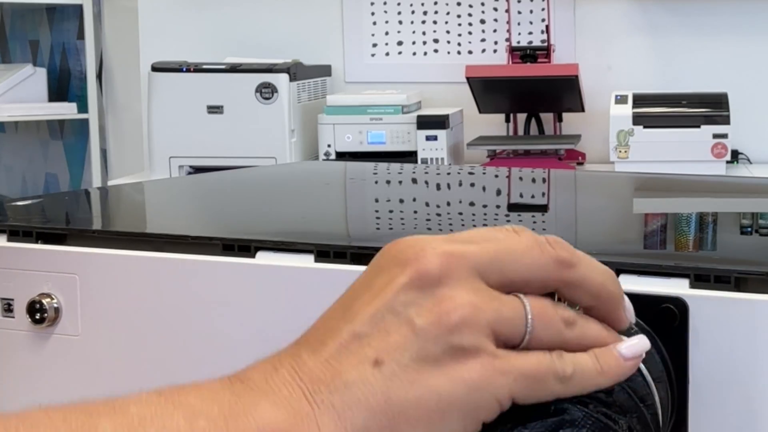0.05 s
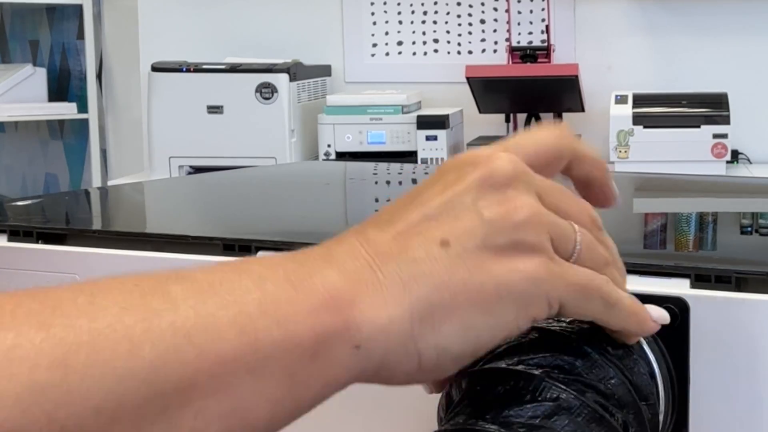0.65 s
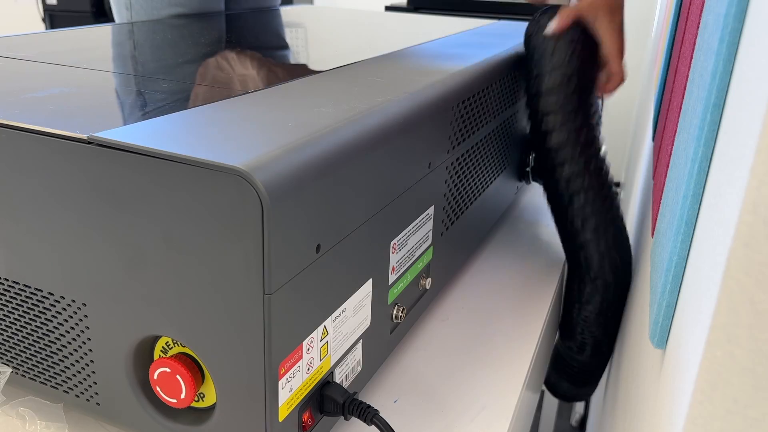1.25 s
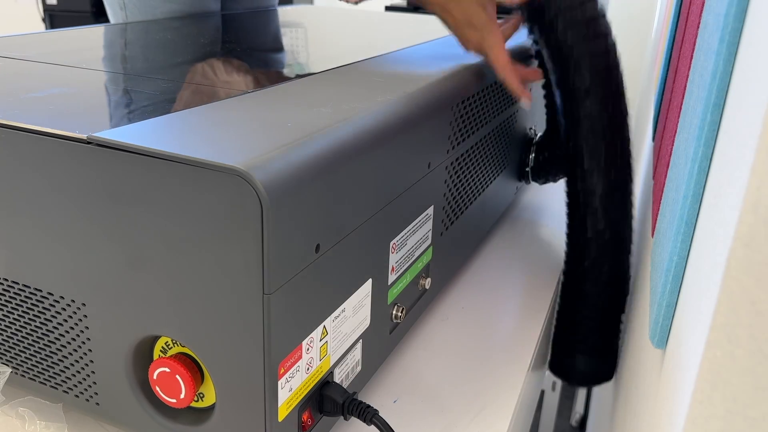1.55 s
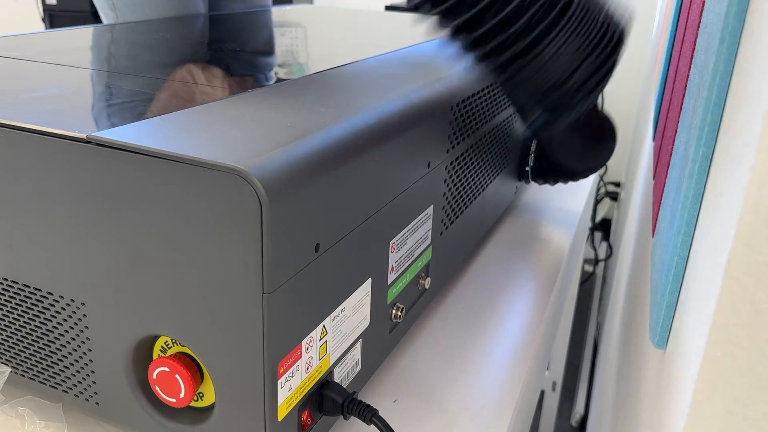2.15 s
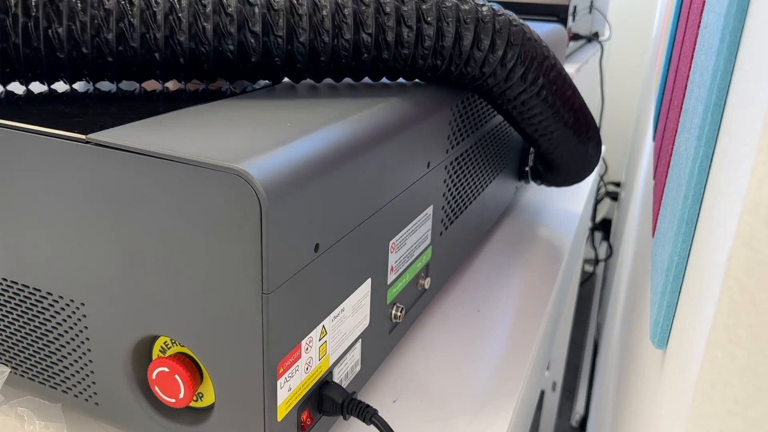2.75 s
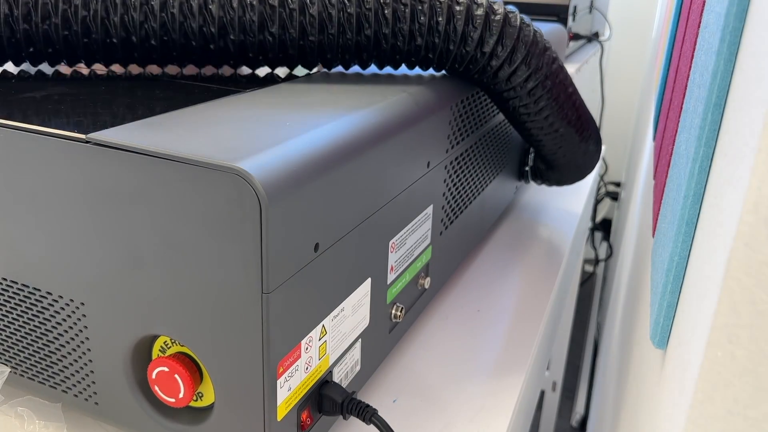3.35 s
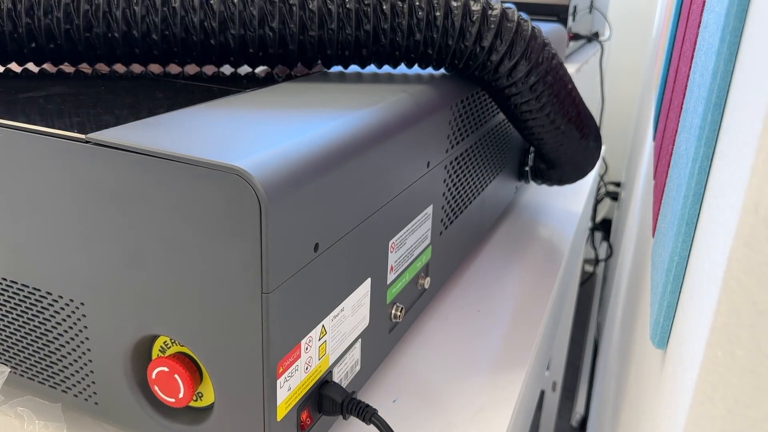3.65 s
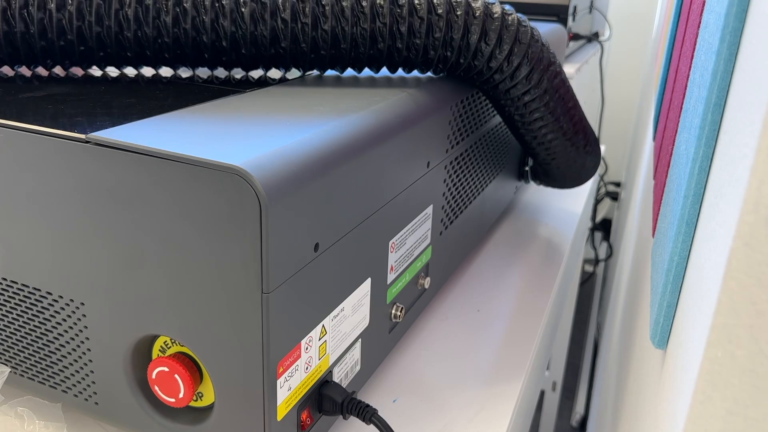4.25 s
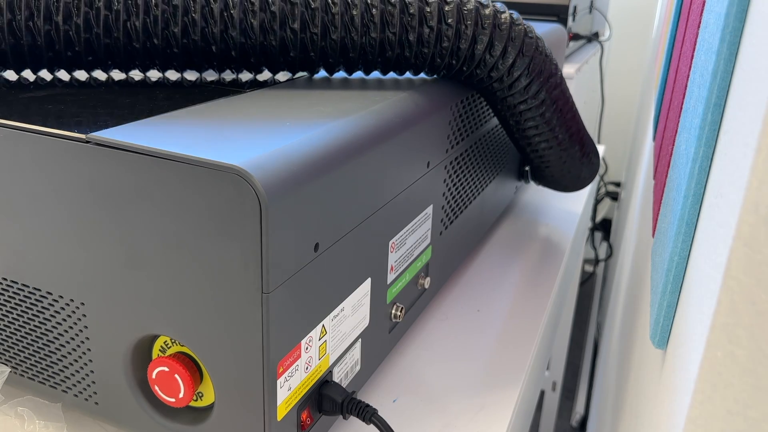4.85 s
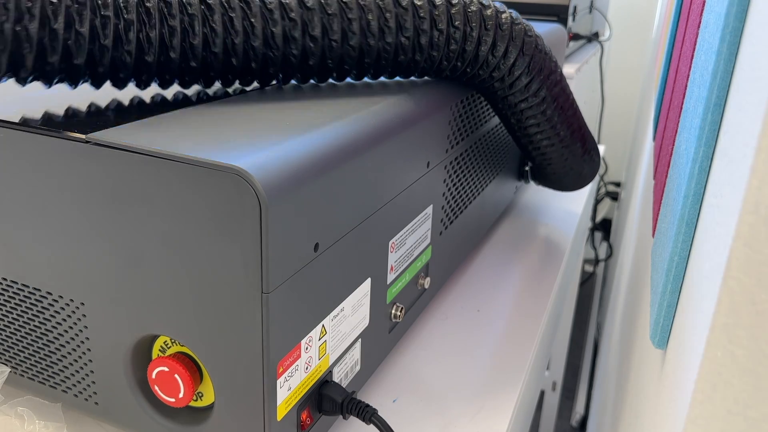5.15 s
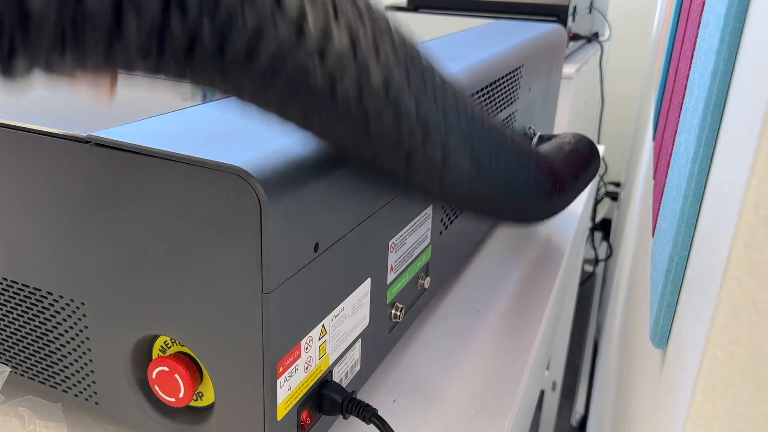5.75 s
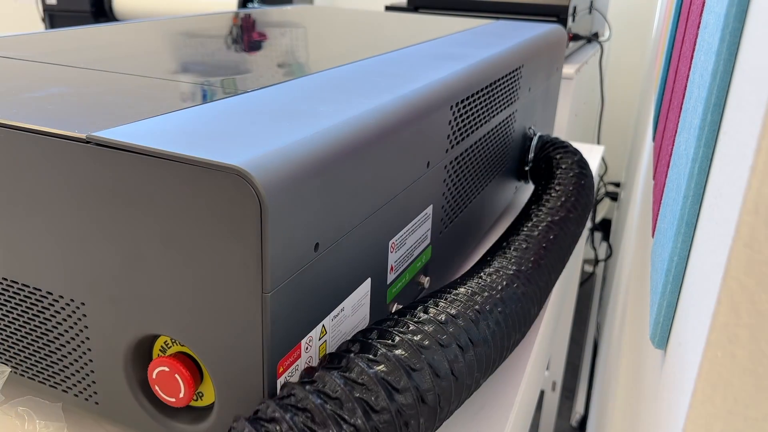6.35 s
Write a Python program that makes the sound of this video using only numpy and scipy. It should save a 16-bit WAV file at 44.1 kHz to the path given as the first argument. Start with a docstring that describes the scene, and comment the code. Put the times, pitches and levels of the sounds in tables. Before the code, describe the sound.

Close to the microphone in a small workshop, a flexible duct hose rubs and bumps against a hollow metal housing with low rumbles and brief ringing knocks. Its foil folds crinkle and snap sharply as it bends, loudest in the first half. After a quieter stretch of rustling comes a longer run of crackling, slightly to the left, then some soft taps. Faint ventilation hums underneath.

```python
"""Fitting an exhaust hose

A ribbed foil-and-wire hose is twisted onto the port of a sheet-metal machine, then lifted over it
and laid down. Its folds crinkle and snap as it bends, its cuff scrapes over the metal, and its ribs
knock on the hollow cabinet, which rings. All around is a small, softly humming workshop."""
import sys
import numpy as np
from scipy import signal
from scipy.fft import rfft, irfft, next_fast_len
from scipy.io import wavfile
from scipy.ndimage import map_coordinates

SR = 44100
rng = np.random.default_rng(int(sys.argv[2]) if len(sys.argv) > 2 else 0)


def write(x):
    x = np.atleast_2d(x).T
    wavfile.write(sys.argv[1], SR, np.round(np.clip(x, -1, 1) * 32767).astype(np.int16))

N = 291148

# The loudest folds popping over: t/s, level/dB, crunch added to that level/dB
LOUD_FOLDS = [(0.3488, -32, -16), (0.5657, -38, -4), (0.6653, -28, -27), (0.7455, -41.5, 5.5),
              (0.8453, -26, -28), (1.268, -27, -13), (1.3504, -13.5, -14.5), (1.3523, -21, -13),
              (1.524, -16, -17), (1.6046, -24, -20), (1.6303, -30, -8), (1.772, -29.5, -7.5),
              (1.7937, -33, -16), (1.8294, -30, -10), (2.1548, -45.5, -7), (2.1895, -34, 2),
              (2.2237, -32, -29), (2.2363, -29, -31), (2.249, -44, -25), (2.2698, -23, -34),
              (2.2922, -42, -19), (2.3037, -37.5, -14), (2.5107, -22.5, -8.5), (2.55, -18.5, 2.5),
              (2.5527, -12, -25), (2.76, -29, -21), (2.7826, -29.5, -13.5), (2.8044, -29, -9.5),
              (3.0409, -17.5, -20), (3.0885, -31.5, -21), (3.2216, -36, -19), (3.2644, -40.5, -4.5),
              (4.2535, -31.5, -17), (4.2646, -29, -6.5), (4.4777, -46.5, -9), (4.5776, -47, -11.5),
              (4.8523, -31, -16), (4.8722, -23, -18.5), (4.8871, -23, -18), (4.9451, -21.5, -14.5),
              (5.0755, -35, -10), (5.1233, -35, -11), (5.2947, -29, -3.5), (5.3022, -22.5, -12),
              (5.439, -25, -11.5), (5.4615, -20, -9), (5.54, -29, -13), (5.626, -27.5, -4),
              (5.7197, -28, -10), (5.8635, -37.5, 2.5), (5.9612, -42, -0.5), (6.0733, -41.5, -27)]
# The bright tone of foil: f/Hz, level/dB
FOIL_TONE = [(500, -38), (2000, -25.5), (3500, -9.5), (5000, -8.5), (7000, -3), (8400, 3), (9800, 1),
             (13000, -12.5), (16000, -21.5)]
# The lower crunch of jolted ribs: f/Hz, level/dB
CRUNCH_TONE = [(300, -25.5), (900, -0.5), (1600, -2.5), (2200, -1), (2900, -2.5), (4000, -6), (6000, -13),
               (16000, -25)]
def snaps(folds):
    """Single folds of the foil buckle with a bright tick and jolt their rib."""
    ticks, jolts = np.zeros((2, N))
    t = np.arange(SR // 8) / SR
    for s, db, crunch_db in folds:
        add(ticks, s, amp(db - 1.5) * burst(t, t60=0.008, tail_db=-24, tail_t60=0.04))
        add(jolts, s, amp(db + crunch_db + 2.5) * burst(t, t60=0.017, tail_db=-23.5, tail_t60=0.07))
    return coloured(ticks, FOIL_TONE) + coloured(jolts, CRUNCH_TONE)


def small_folds(foil_db, count=300, per_second=22, boost_db=15, crunch_db=-9.5):
    """More rows for snaps(): folds pop at random moments, louder when the bend is harder."""
    samples = (np.cumsum(rng.exponential(1, count)) / per_second * SR).astype(int)
    scatter_db = 5.5 * np.clip(rng.standard_normal(count), -2, 2)
    return [(i / SR, foil_db[i] + boost_db + db, crunch_db) for i, db in zip(samples, scatter_db) if i < N]


def crinkle(foil_db, crunch_db):
    """Bending sets off clumps of tiny creases; the harder the bend, the faster they come."""
    per_second = np.clip(520 * amp(foil_db + 48), 160, 2400)
    creases = grains(per_second, spread_db=4.5) * amp(3 * wobble(120))
    t = np.arange(SR // 100) / SR
    # every crease shivers for a few milliseconds
    energy = signal.fftconvolve(creases ** 2, amp(-120 * t / 0.016))[:N]
    shiver = unit(np.sqrt(np.abs(energy)))
    fine, coarse = shiver * rng.standard_normal((2, N))
    foil = coloured(amp(foil_db - 5) * fine, FOIL_TONE)
    return foil + coloured(amp(crunch_db - 8.5) * coarse, CRUNCH_TONE)


# Each bend of the hose: t/s, length/s, foil level/dB, swell from start to end/dB, rib level/dB
HOSE_BENDS = [(0.0, 0.26, -64.5, 18.5, -50.5), (0.324, 0.042, -44, 0.5, -42), (0.435, .38, -60.5, 1, -52.5),
              (0.842, 0.027, -43, -0.5, -44), (0.928, 0.098, -67.5, -4, -47), (1.09, .14, -61, 4, -49.5),
              (1.244, 0.088, -45.5, 2.5, -34), (1.374, 0.068, -56, -3.5, -41.5),
              (1.521, 0.089, -48, -1, -54), (1.763, 0.082, -56, -0.5, -50), (2.078, 0.051, -68.5, 3, -62),
              (2.227, 0.46, -57.5, -6, -54.5), (2.504, 0.055, -61, 3, -58), (2.7, 0.32, -53.5, -1, -53),
              (3.182, 0.12, -60, -11, -59), (3.41, 0.17, -71, 1, -66), (3.71, 0.061, -65.5, -10, -61),
              (4.254, 0.37, -65.5, -16.5, -60.5), (4.876, .085, -46, -4.5, -46.5),
              (4.99, 0.43, -50, 10, -49.5), (5.314, 0.13, -38, -2.5, -40.5), (5.481, 0.21, -45.5, 3.5, -46),
              (5.87, 0.26, -67.5, -9, -60.5), (6.372, .22, -72, 2, -55.5)]
def bending_hose():
    """As the hose bends, its foil crinkles, its ribs crunch and its folds pop over."""
    foil_rows = [(s, length, db, swell) for s, length, db, swell, _ in HOSE_BENDS]
    rib_rows = [(s, length, db, swell) for s, length, _, swell, db in HOSE_BENDS]
    foil_db, crunch_db = [movements(rows, rise_s=0.053, fall_s=0.13) for rows in (foil_rows, rib_rows)]
    return snaps(LOUD_FOLDS + small_folds(foil_db)) + crinkle(foil_db, crunch_db)


# How much the foil's highest treble is turned up or down: t/s, level/dB
FOIL_SHEEN = [(0, 4.5), (1.35, 2), (1.6, 2.5), (2.35, 7.5), (2.5, -4), (3.3, -2), (4.3, -3.5), (5.3, 5),
              (6.1, -2)]
def sheen(foil, above_hz=11200):
    """The foil's highest treble grows brighter or duller over time."""
    treble = filtered(foil, lambda hz: 1 - 1 / (1 + (hz / above_hz) ** 20))
    return foil + (amp(over_time(FOIL_SHEEN)) - 1) * treble


# The hose hits the cabinet: t/s, level/dB, clack added to that level/dB, boom added to it/dB
CABINET_HITS = [(0.082, -35, -17, 1.5), (0.563, -34.5, -5, 3), (0.59, -34.5, -9, -12),
                (0.665, -48, 13.5, 7), (0.695, -28.5, -9, -12), (0.744, -33.5, -4, -8),
                (0.932, -35, 0, -11), (0.997, -42.5, 10, -18), (1.334, -19.5, -9, 6.5), (1.351, -28, 5, 7),
                (1.416, -31.5, -1.5, -12), (1.522, -26, 1, 8), (2.191, -31.5, 1.5, -11),
                (2.5012, -37, 3.5, -6), (2.511, -30.5, -7, -5), (2.553, -18, -8, -7.5),
                (2.782, -42, -7, 3.5), (2.89, -47, 8.5, 13), (2.936, -38.5, 1, -0.5),
                (3.039, -45, 10.5, 8.5), (3.219, -42, -1.5, -5), (3.414, -43, 4.5, 2),
                (4.256, -43, -11.5, 0.5), (5.863, -37.5, -0.5, -12), (5.961, -44, -4, -19),
                (6.368, -34.5, -4.5, -3), (6.472, -35.5, -1.5, -13)]
# The notes of the cabinet's heavy frame: f/Hz, level/dB, time to fade by 60 dB/s
FRAME_NOTES = [(63.5, -10.5, 0.25), (95.2, 9.5, 0.45), (93.5, -3, 0.12), (136.5, 5.5, 0.14),
               (146, -5, 0.11)]
# The boom of the air inside the hose: f/Hz, level/dB, time to fade by 60 dB/s
BOOM_NOTES = [(199, -10.5, .1), (214.4, -9, 0.26), (235, -12, 0.15)]
# The notes of its sheet-metal panels: f/Hz, level/dB, time to fade by 60 dB/s
PANEL_NOTES = [(297.3, -1, 0.27), (320, -4, 0.29), (344, -8, 0.27), (374, -1, 0.18), (403.5, 1.5, 0.15),
               (449.2, 7, 0.13), (463, 1, 0.092), (526, -12.5, 0.056), (585, -6.5, 0.072),
               (649, -15, 0.025), (714, -8.5, 0.1), (806, -5.5, 0.057), (954, -11, .1)]
# The dull thud of a knock: f/Hz, level/dB
THUD_TONE = [(120, -39), (250, 1.5), (370, 2.5), (480, 5), (560, -2.5), (640, 0), (900, -3), (1400, -21),
             (4000, -50)]
# The clack of wire ribs on metal: f/Hz, level/dB
CLACK_TONE = [(150, -32.5), (450, -8.5), (900, 10.5), (1300, 7.5), (1800, 8), (2600, 0), (4000, -6.5),
              (8000, -17), (16000, -70)]
def knocks():
    """The wire ribs clack on the cabinet; its frame and panels ring on, and the air in the hose booms."""
    ringing, thuds, clacks = np.zeros((3, N))
    t = np.arange(SR // 2) / SR
    for s, db, clack_db, boom_db in CABINET_HITS:
        add(ringing, s, amp(db - 13) * ring(FRAME_NOTES, t, rise_s=0.0087))
        add(ringing, s, amp(db + boom_db - 2.5) * ring(BOOM_NOTES, t, rise_s=0.0019))
        add(ringing, s, amp(db - 5) * ring(PANEL_NOTES, t, rise_s=0.0011))
        # many short-lived notes between the clear ones blur into a thud
        add(thuds, s, amp(db) * burst(t, t60=0.079, tail_db=-30.5, tail_t60=0.15))
        add(clacks, s, amp(db + clack_db + 2.5) * burst(t, t60=0.026, tail_db=-27, tail_t60=0.11))
    return ringing + coloured(thuds, THUD_TONE) + coloured(clacks, CLACK_TONE)


# The hose slides on metal: t/s, length/s, level/dB, swell from start to end/dB
HOSE_SLIDES = [(0.0, 0.096, -49.5, 16), (0.11, 0.096, -36.5, 0), (0.27, 0.11, -42.5, -1),
               (0.51, 0.034, -44.5, 6), (0.75, 0.035, -44.5, 7), (0.935, 0.091, -37.5, 4),
               (1.09, 0.036, -40.5, 5.5), (1.2, 0.097, -37, -6.5), (1.35, .09, -38, -19),
               (1.52, 0.075, -40, -10.5), (2.22, 0.34, -59, 16), (2.55, 0.032, -49, -21),
               (2.79, 0.37, -54, 8), (3.19, 0.27, -56, 6.5), (4.26, 0.27, -60.5, -11.5),
               (4.86, 0.85, -60, 6), (5.87, 0.15, -56.5, -13), (6.22, 0.013, -51, 1), (6.37, 0.12, -58, -4)]
# The tone of the cuff rubbing on metal: f/Hz, level/dB
SCRAPE_TONE = [(150, -24.5), (350, -6.5), (520, 2.5), (720, -0.5), (1000, -6), (1400, -10.5), (2600, -15),
               (4000, -30.5), (9000, -31.5), (16000, -52)]
def scrape(ribs_per_second=36, unevenness=0.3, rib_fade_db=8):
    """The cuff sticks and slips; each passing rib catches suddenly, then lets go."""
    slide_db = movements(HOSE_SLIDES, rise_s=0.035, fall_s=0.15)
    ribs_passed = np.cumsum(ribs_per_second * np.exp(unevenness * wobble(ribs_per_second))) / SR
    catch_db = rib_fade_db * (0.5 - ribs_passed % 1)
    slips = unit(grains(2000, spread_db=4) * amp(3 * wobble(70)))
    return coloured(amp(slide_db + catch_db - 2.5) * slips, SCRAPE_TONE)


# The hand shoves or swings the hose: t/s, length/s, cabinet level/dB, tube level/dB
HAND_SHOVES = [(0.082, .32, -34, -44.5), (0.54, 0.056, -24.5, -44), (0.71, 0.086, -26.5, -41),
               (0.949, .37, -31, -38.5), (1.333, 0.058, -23, -30), (1.52, 0.048, -29, -30),
               (1.718, 0.083, -42.5, -36.5), (1.845, 0.03, -37, -31.5), (2.214, 0.015, -42, -29.5),
               (2.3, 0.14, -52, -46.5), (2.405, .04, -37.5, -50), (2.53, 0.079, -28, -30.5),
               (2.68, .22, -38, -49), (2.932, 0.052, -31, -46), (3.064, 0.018, -37, -36),
               (3.145, 0.33, -43.5, -53), (3.896, .02, -44, -64.5), (4.272, 0.059, -39.5, -48.5),
               (4.496, .06, -45.5, -48), (4.789, 0.032, -45.5, -47.5), (5.037, 0.13, -50, -45.5),
               (5.361, 0.096, -57, -41.5), (5.506, 0.23, -56, -47), (5.957, 0.0092, -32, -38),
               (6.226, 0.033, -40.5, -45), (6.382, 0.026, -35, -38.5), (6.472, 0.018, -38.5, -37.5)]
# The low rumble of the shaken cabinet: f/Hz, level/dB
RUMBLE_TONE = [(40, -28.5), (66, -2), (88, 2), (108, -1), (128, 5.5), (160, -14), (225, -8.5), (280, -8.5),
               (500, -40.5), (2000, -77)]
# The hollow rustle of air in the hose: f/Hz, level/dB
TUBE_TONE = [(120, -35.5), (230, -9), (305, -2.5), (335, 3), (372, 5.5), (415, -5), (465, -1.5), (540, -17),
             (750, -21), (2000, -52.5)]
def rumble():
    """Moving the hose shakes the cabinet and stirs the air in the tube."""
    push_rows = [(s, length, db, 0) for s, length, db, _ in HAND_SHOVES]
    tube_rows = [(s, length, db, 0) for s, length, _, db in HAND_SHOVES]
    push_db, tube_db = [movements(rows, rise_s=0.036, fall_s=0.094) for rows in (push_rows, tube_rows)]
    cabinet = coloured(amp(push_db - 4.5) * grains(900, spread_db=1), RUMBLE_TONE)
    return cabinet + coloured(amp(tube_db - 7.5) * grains(620, spread_db=5.5), TUBE_TONE)


# Ribs are dragged quickly over an edge: t/s, length/s, level/dB
RIB_DRAGS = [(0.994, 0.007, -47), (1.02, 0.0088, -53), (1.239, 0.0099, -35), (1.523, 0.06, -36),
             (2.555, 0.0067, -40), (3.392, 0.043, -56.5), (5.327, 0.027, -41), (5.464, .015, -57),
             (5.605, 0.025, -46), (6.206, 0.015, -61)]
# The tone of that rattle: f/Hz, level/dB
RASP_TONE = [(300, -11), (800, -22.5), (1300, 3.5), (1800, 5.5), (2400, 1), (4000, -13.5), (8000, -7),
             (16000, -39)]
def rasps():
    """A run of ribs catches on an edge in a rough, fast rattle."""
    out, catches = np.zeros(N), grains(2200, spread_db=5.5)
    for s, length, db in RIB_DRAGS:
        n = int(length * SR)
        add(out, s, amp(db) * signal.windows.tukey(n, 0.2) * catches[int(s * SR):][:n])
    return coloured(out, RASP_TONE)


# Short squeaks of the hose's skin: t/s, length/s, f/Hz, level/dB
SKIN_SQUEAKS = [(0.838, 0.03, 1884, -46.5), (0.852, 0.028, 3340, -50), (0.886, 0.026, 1467, -49.5),
                (3.434, 0.04, 2660, -57.5), (4.783, 0.0065, 3860, -47.5), (5.672, 0.014, 4300, -44.5)]
def squeaks():
    """The plastic skin catches on the metal and sings for an instant, at a shaky pitch."""
    out = np.zeros(N)
    for s, length, hz, db in SKIN_SQUEAKS:
        n = int(length * SR)
        pitch = hz * (1 + 0.09 * wobble(900)[:n])
        add(out, s, amp(db + 5) * np.hanning(n) * np.sin(2 * np.pi * np.cumsum(pitch) / SR))
    return out


# Where the hose is: t/s, head start of the left side/ms
LEFT_LEAD = [(0, 0), (2.2, 0), (2.5, .2), (3.05, .3), (4.25, .32), (4.9, .37), (5.3, .45), (5.76, .48),
             (5.85, 0), (6.6, 0)]
def placed(x):
    """As the hose swings left, its sound reaches the left side sooner."""
    shift = over_time(LEFT_LEAD) * SR / 2000  # half the head start for each side, in samples
    return np.array([map_coordinates(x, [np.arange(N) + offset]) for offset in (shift, -shift)])


# The tone of sound bouncing off the walls: f/Hz, level/dB
WALL_TONE = [(100, -8), (250, -9.5), (600, -6.5), (2000, -4), (5000, -4.5), (9000, -8), (16000, -4.5)]
# How long the echo lasts: f/Hz, time to fade by 60 dB/s
ECHO_TIMES = [(100, 0.36), (400, 0.2), (2000, 0.22), (6000, 0.23), (14000, 0.24)]
def room(x):
    """The workshop's walls send back a short wash of echoes that lasts longest in the bass."""
    bounced = filtered(x, lambda hz: amp(along(WALL_TONE, hz)))
    hz, t, noise = signal.stft(rng.standard_normal((2, SR // 2)), SR, nperseg=256)
    fade = amp(-60 * t / along(ECHO_TIMES, hz)[:, None])
    echo = all_around(signal.istft(noise * fade, SR, nperseg=256)[1])
    echo = np.pad(echo / np.linalg.norm(echo[0]), ((0, 0), (SR // 250, 0)))  # arrives 4 ms late
    return signal.fftconvolve(bounced[None], echo, axes=1)[:, :N]


# How alike the room sounds on the left and right: f/Hz, likeness (1 means the same)
SIDE_LIKENESS = [(60, 0.97), (200, 0.85), (500, 0.14), (1200, 0.032), (16000, 0.035)]
def all_around(pair):
    """Two separate noises fill the room: both sides alike in the bass, different in the treble."""
    def shares(hz):
        angle = np.arccos(np.clip(along(SIDE_LIKENESS, hz), -1, 1)) / 2
        return np.array([np.cos(angle), np.sin(angle)])
    middle, side = filtered(pair, shares)
    return np.array([middle + side, middle - side])


# The rush of the ventilation: f/Hz, level/dB
VENT_TONE = [(20, -40.5), (35, -5.5), (54, 4), (85, -8.5), (130, 0.5), (170, -9.5), (350, -15),
             (700, -25.5), (2000, -32.5), (5000, -41.5), (8500, -40), (16000, -65.5)]
# The notes of distant machines: f/Hz, level/dB
HUM_NOTES = [(54, -57), (61, -66.5), (123, -58), (132, -60.5)]
def vents_and_hum():
    """Air rushes softly through the vents while distant machines hum unsteadily."""
    air = all_around(np.array([coloured(rng.standard_normal(N), VENT_TONE) for _ in range(2)]))
    t, hum = np.arange(N) / SR, np.zeros(N)
    for hz, db in HUM_NOTES:
        strength = amp(db + 0.83 * wobble(5.3)) * np.sqrt(2)
        hum += strength * np.sin(2 * np.pi * hz * t + 0.7 * wobble(3.8))
    return amp(-53) * unit(air) + hum


def movements(rows, rise_s, fall_s, shake_db=1.94, shakes_per_second=25):
    """Level in dB of an unsteady hand's moves; rise_s and fall_s are the times to change by 20 dB."""
    s, length, db, swell_db = np.transpose(rows)[:, :, None]
    t = np.arange(0, N, 64) / SR
    held_db = db + swell_db * (np.clip((t - s) / length, 0, 1) - 0.5)
    fade_db = 20 * (np.maximum(s - t, 0) / rise_s + np.maximum(t - s - length, 0) / fall_s)
    loudest_db = np.interp(np.arange(N) / SR, t, (held_db - fade_db).max(0))
    return loudest_db + shake_db * wobble(shakes_per_second)


def ring(notes, t, rise_s, scatter_db=1.5):
    """A struck part rings with fading notes, a little different at every blow."""
    hz, db, t60 = np.transpose(notes)[:, :, None]
    size, detune, side = rng.standard_normal((3, len(notes), 1))
    strength = np.sign(side) * amp(db + scatter_db * size - 60 * t / t60)
    waves = strength * np.sin(2 * np.pi * hz * (1 + 0.0097 * detune) * t)
    sound = waves.sum(0) * (1 - np.exp(-t / rise_s))
    return sound / np.std(sound[:SR // 33])  # strength 1 over the first 30 ms


def burst(t, t60, tail_db, tail_t60):
    """A crack of noise and a quieter shiver after it; each t60 is the seconds to fade by 60 dB."""
    return rng.standard_normal(len(t)) * (amp(-60 * t / t60) + amp(tail_db - 60 * t / tail_t60))


def grains(per_second, spread_db):
    """Tiny clicks of uneven size at random moments."""
    fires = rng.random(N) < per_second / SR
    sizes = amp(spread_db * np.clip(rng.standard_normal(N), -2, 2)) * rng.choice([-1, 1], N)
    return unit(fires * sizes / np.sqrt(per_second))


def wobble(per_second):
    """A curve that glides from one random value to the next."""
    values = rng.standard_normal(int(N * per_second / SR) + 4)
    return map_coordinates(values, [np.arange(N) * per_second / SR], order=1)


def coloured(x, tone, size=4096):
    """Give a sound the tone in a table of f/Hz, level/dB."""
    cepstrum = irfft(np.log(amp(along(tone, np.fft.rfftfreq(size, 1 / SR)))))
    # folding this in half makes the filter ring only after a click, never before it
    cepstrum[1:size // 2] *= 2
    cepstrum[size // 2 + 1:] = 0
    kernel = irfft(np.exp(rfft(cepstrum)))
    return signal.fftconvolve(x, kernel / np.linalg.norm(kernel))[:len(x)]


def filtered(x, gain):
    """Turn each frequency up or down by gain(hz)."""
    n = x.shape[-1]
    padded = next_fast_len(n + SR // 4)
    return irfft(rfft(x, padded) * gain(np.fft.rfftfreq(padded, 1 / SR)), padded)[..., :n]


def along(points, hz):
    """Look up a frequency in a table, gliding between its rows by pitch."""
    f, values = np.transpose(points)
    return np.interp(np.log(hz + 1), np.log(f + 1), values)


def over_time(points):
    """Join rows of t/s, value into one value for every sample."""
    return np.interp(np.arange(N) / SR, *np.transpose(points))


def add(track, s, sound):
    """Mix a sound into a track, starting at s seconds."""
    part = track[..., max(round(s * SR), 0):][..., :sound.shape[-1]]
    part += sound[..., :part.shape[-1]]


def amp(db):
    """Turn decibels into a number to multiply by."""
    return 10 ** (np.asarray(db) / 20)


def unit(x):
    """Scale a sound to an average strength (rms) of 1."""
    return x / np.sqrt(np.mean(x ** 2) + 1e-20)


def scene():
    """The hose and cabinet close by, with the workshop's echo and hum behind them."""
    hose = sheen(bending_hose()) + rasps() + squeaks()
    cabinet = knocks() + scrape() + rumble()
    near = hose + cabinet
    return placed(near) + room(near) + vents_and_hum()


# The microphones' tone, with a deep dip in the high treble: f/Hz, level/dB
MIC_TONE = [(9000, -1), (10000, -6), (10700, -18), (11500, -20.5), (12600, -2), (14000, 5.5)]
# How much louder the left side is than the right: f/Hz, level/dB
LEFT_OVER_RIGHT = [(100, .2), (350, 1), (700, 2.6), (1400, 1.8), (2800, 2.1), (6000, 4.6), (9000, .6),
                   (13000, 0)]
def record(dry, top_hz=16100):
    """Two microphones shape the treble and favour the left a little; the very highest sounds are cut."""
    sides = np.array([[0.5], [-0.5]])
    sound = filtered(dry, lambda hz: amp(along(MIC_TONE, hz) + sides * along(LEFT_OVER_RIGHT, hz)))
    return filtered(sound, lambda hz: 1 / (1 + (hz / top_hz) ** 120))


dry = scene()
out = record(dry)
write(out)
```